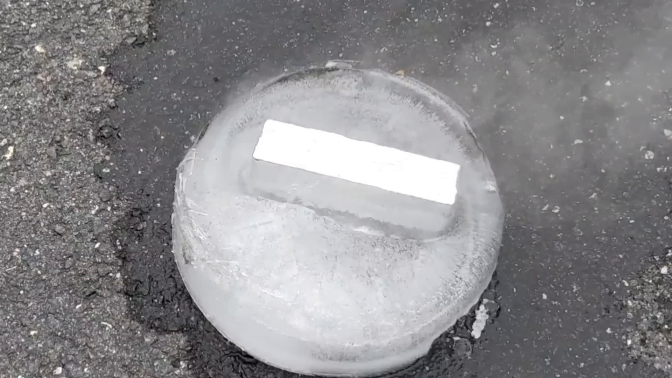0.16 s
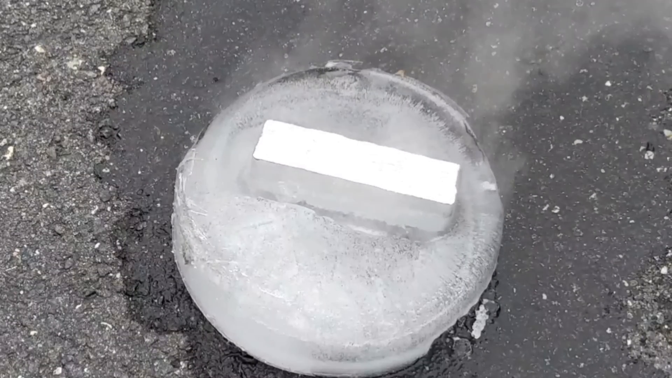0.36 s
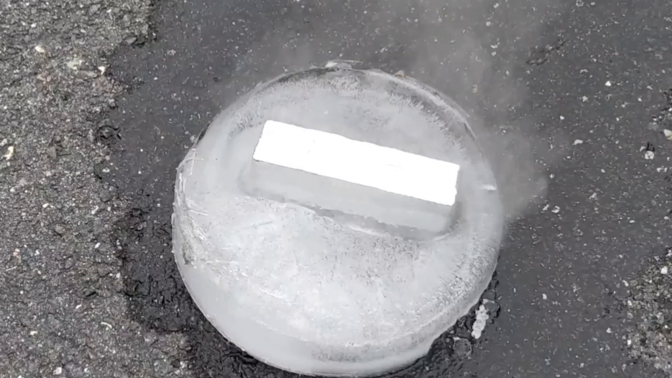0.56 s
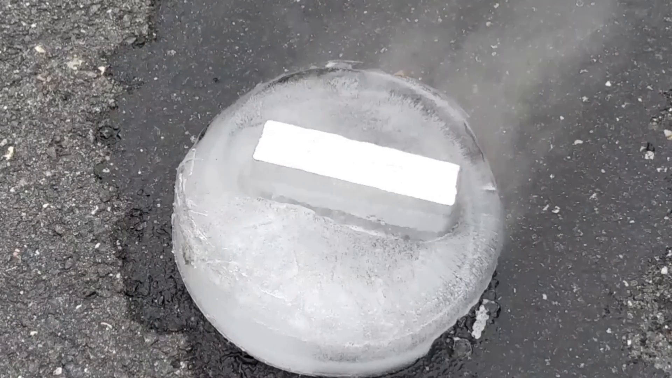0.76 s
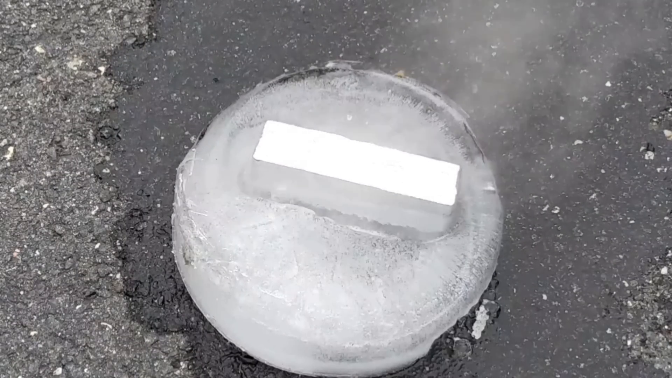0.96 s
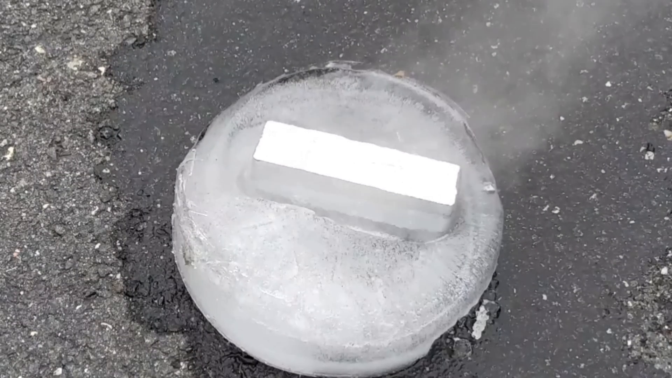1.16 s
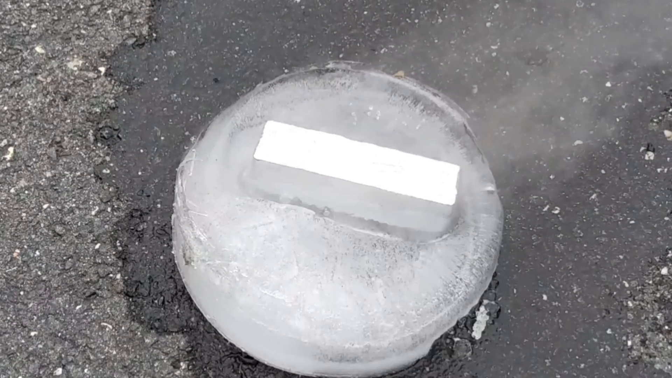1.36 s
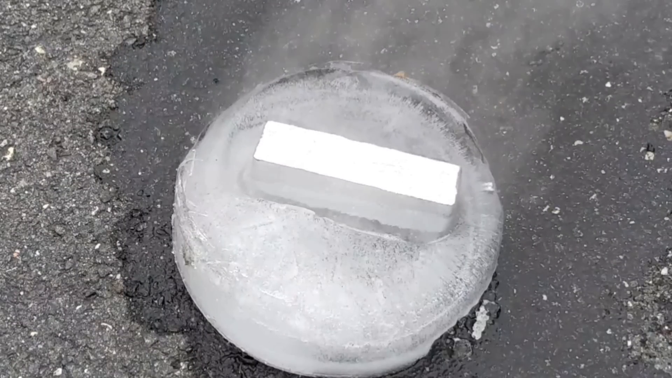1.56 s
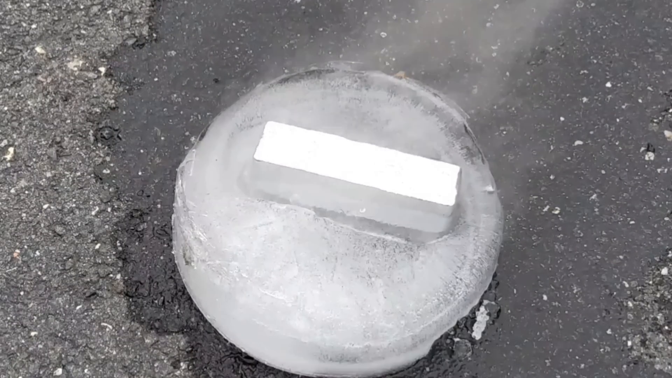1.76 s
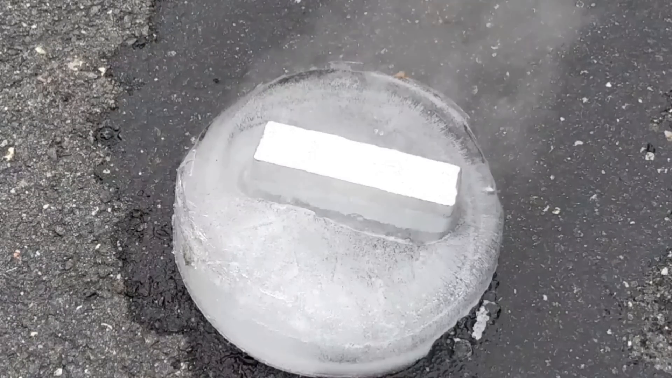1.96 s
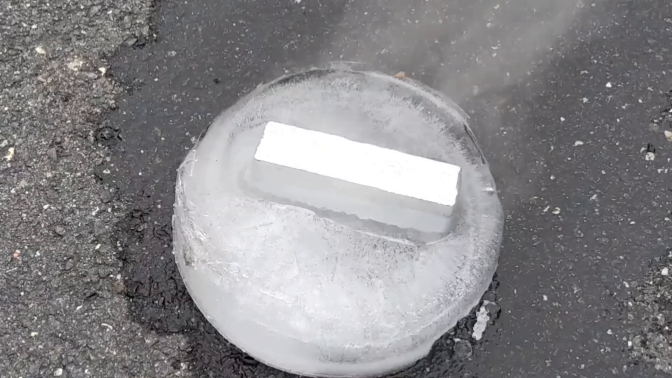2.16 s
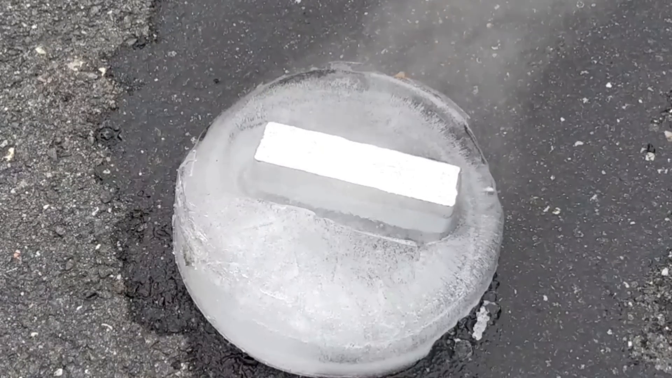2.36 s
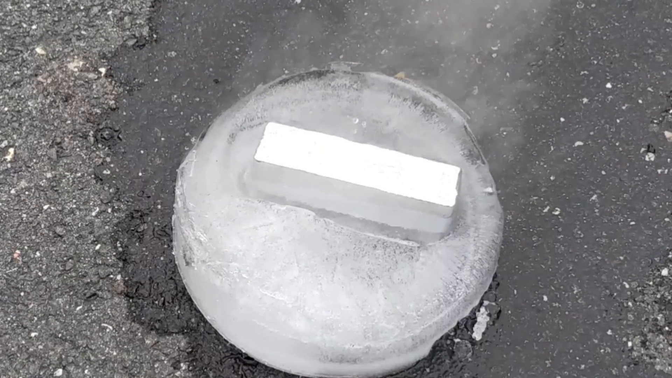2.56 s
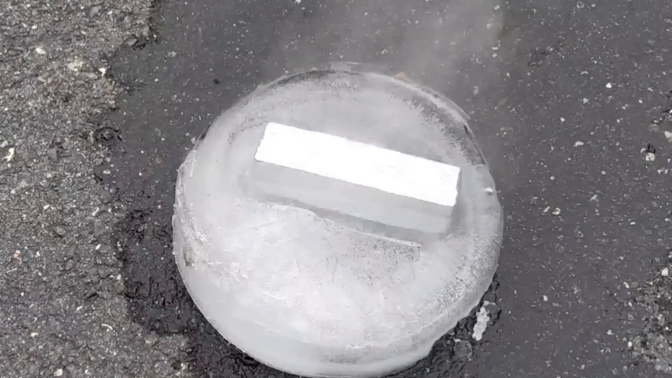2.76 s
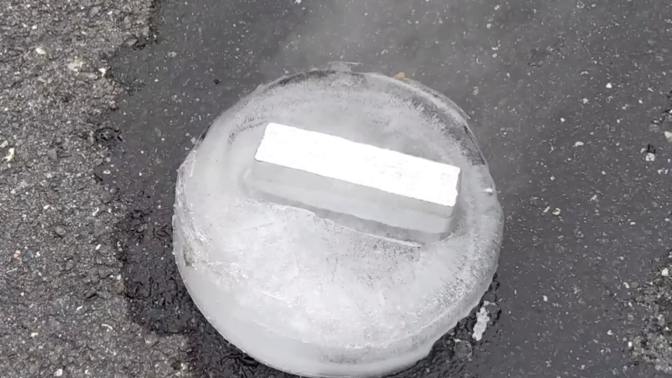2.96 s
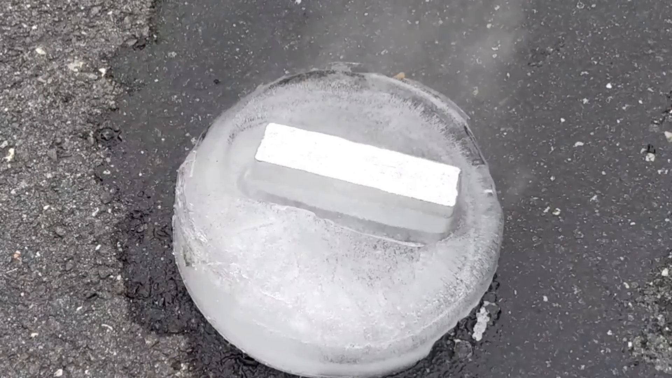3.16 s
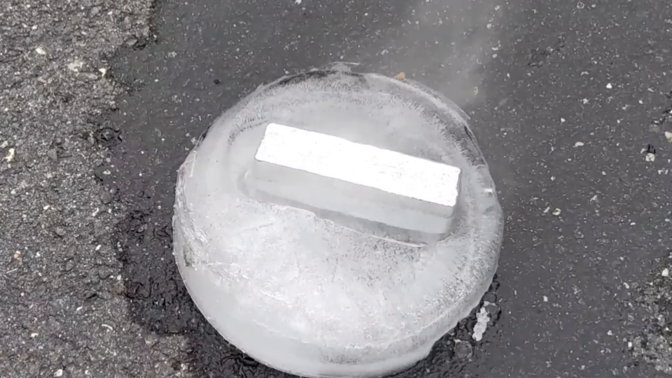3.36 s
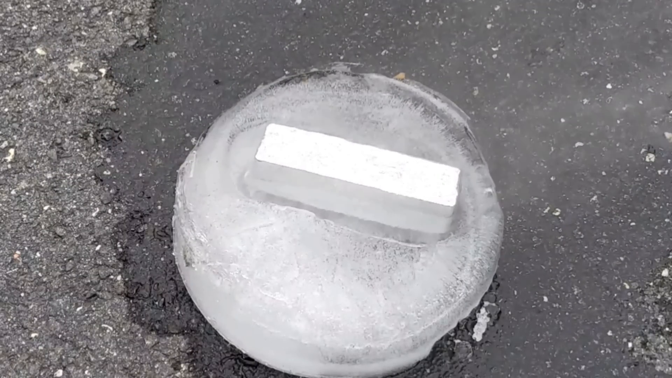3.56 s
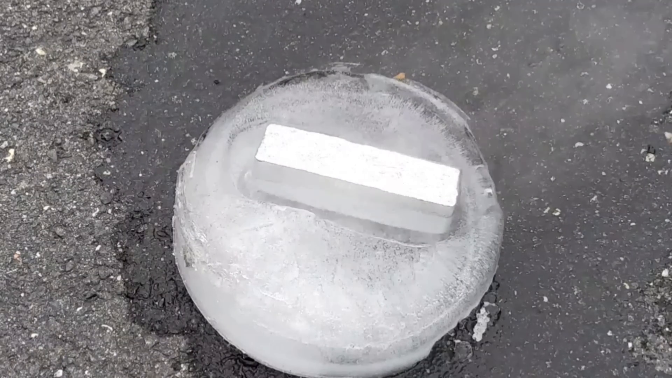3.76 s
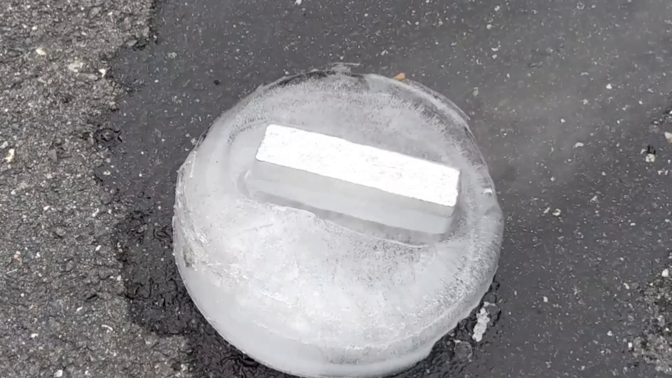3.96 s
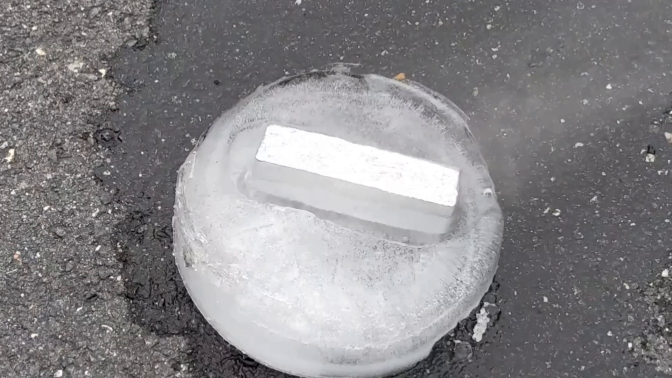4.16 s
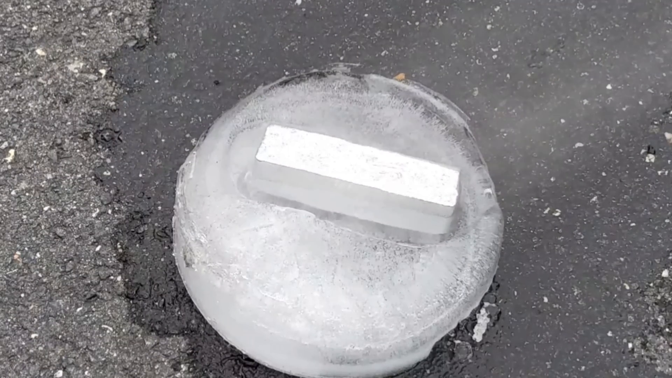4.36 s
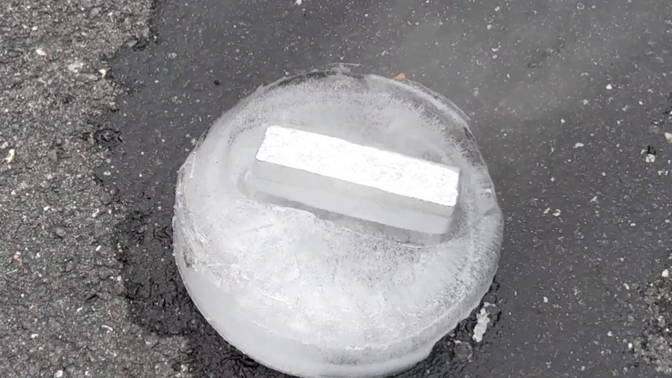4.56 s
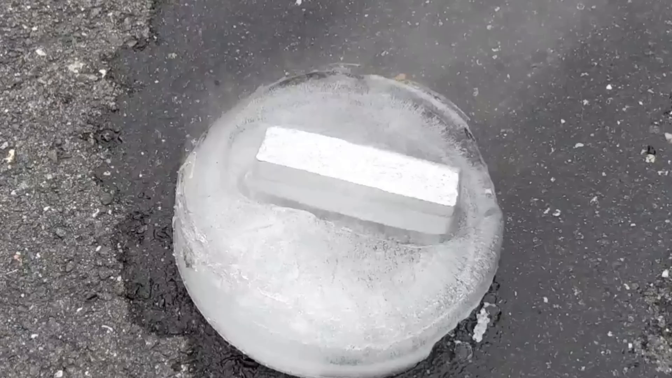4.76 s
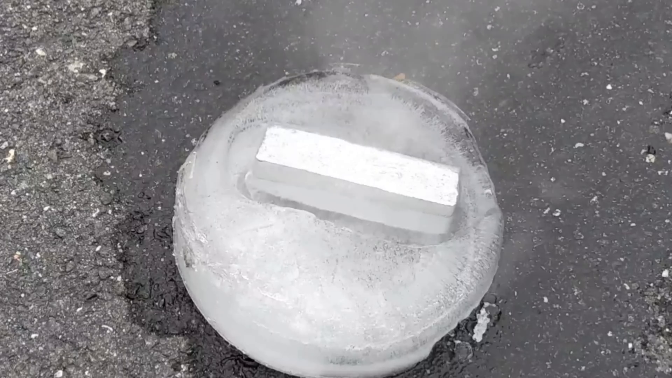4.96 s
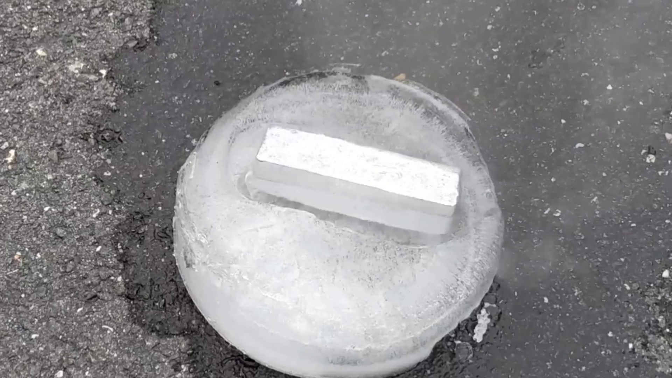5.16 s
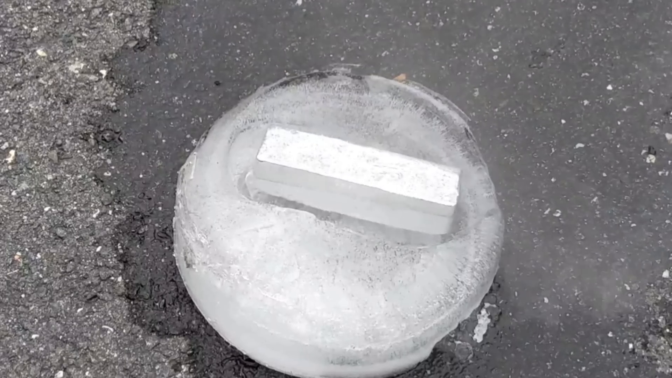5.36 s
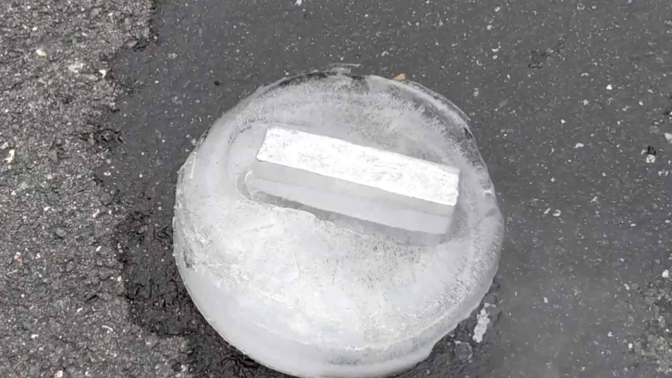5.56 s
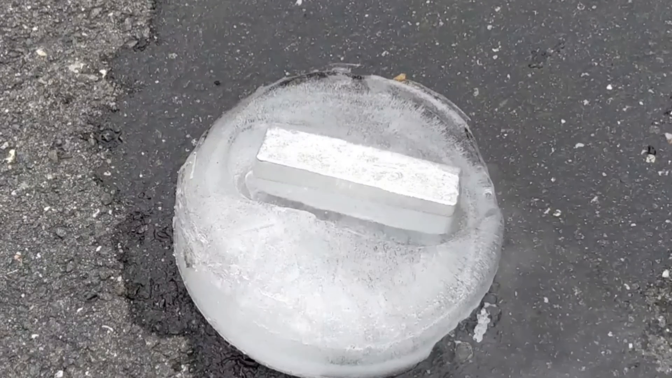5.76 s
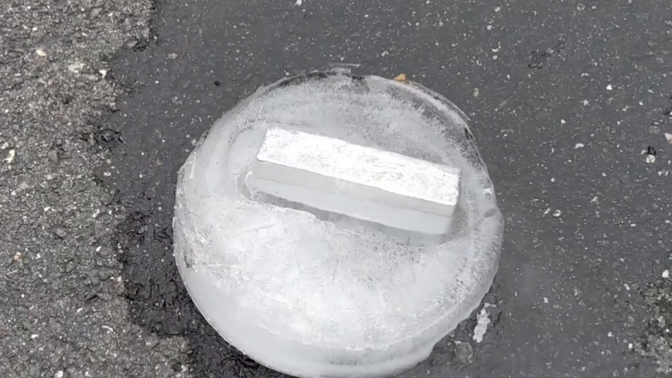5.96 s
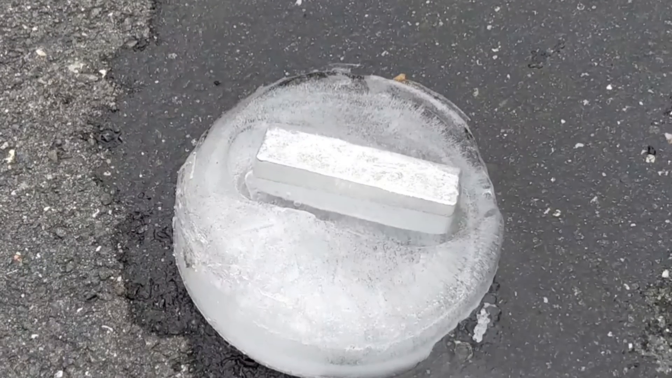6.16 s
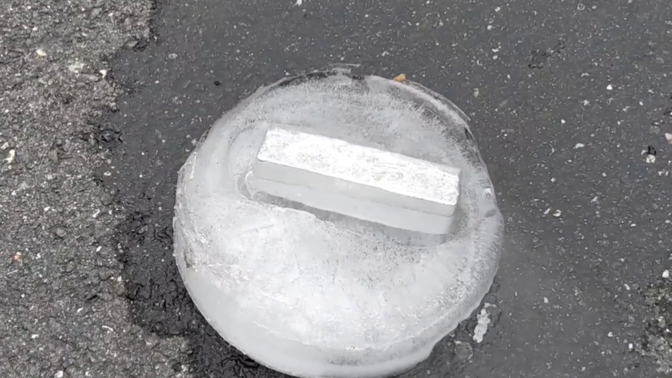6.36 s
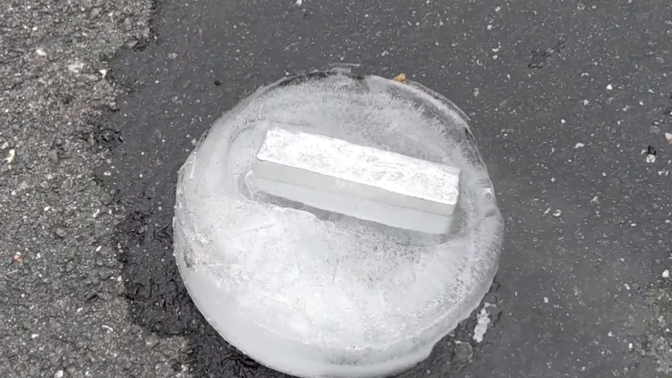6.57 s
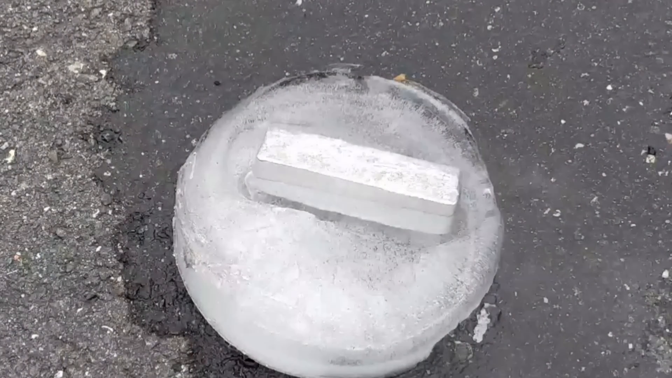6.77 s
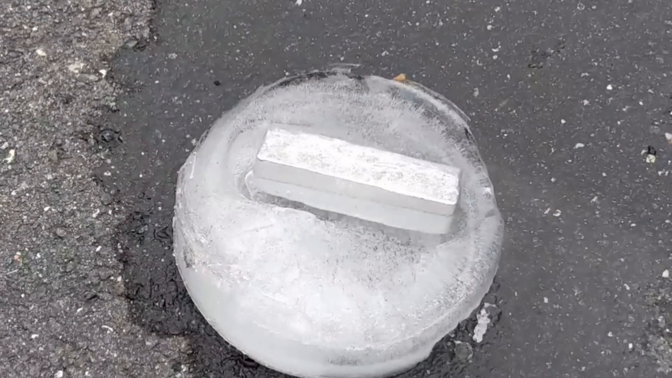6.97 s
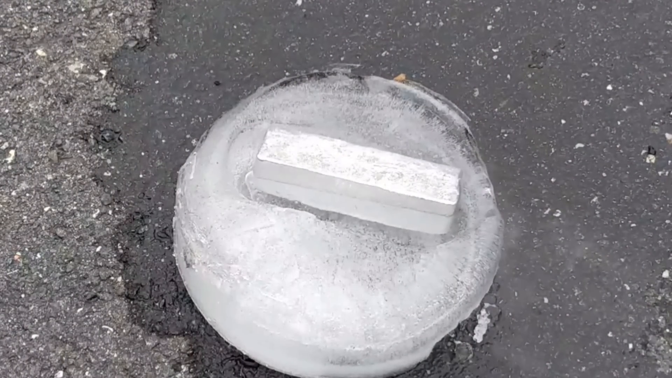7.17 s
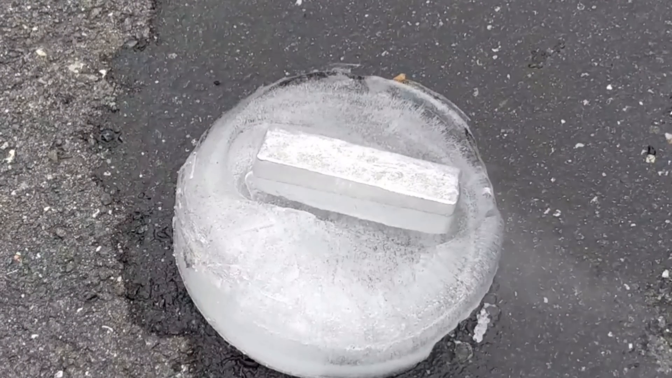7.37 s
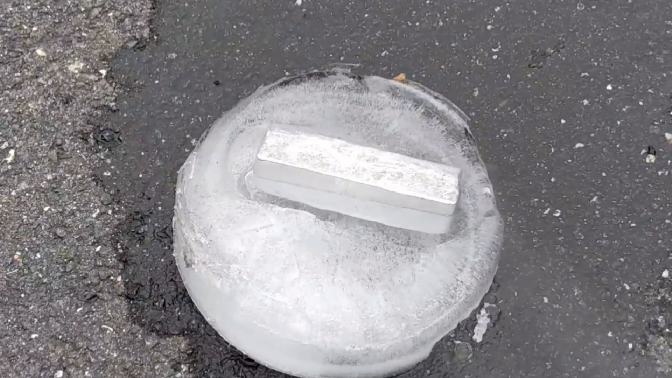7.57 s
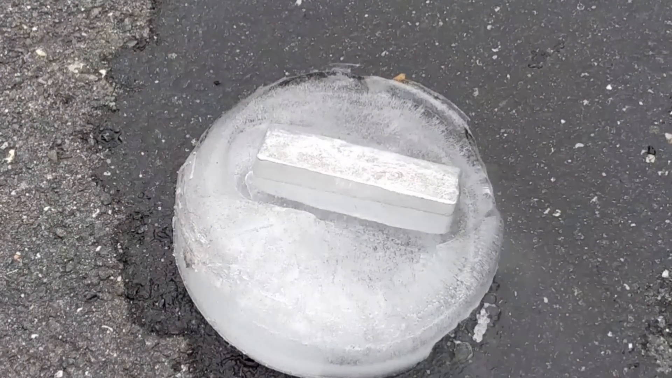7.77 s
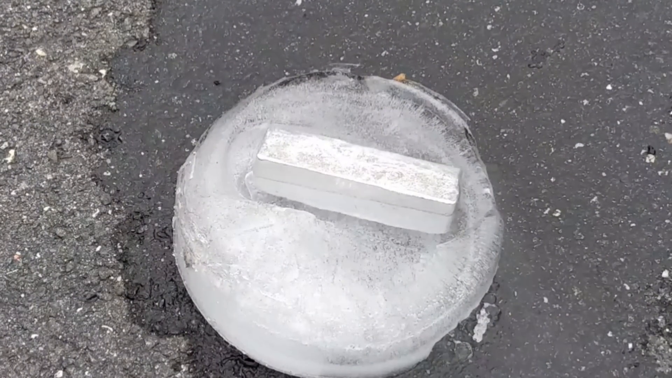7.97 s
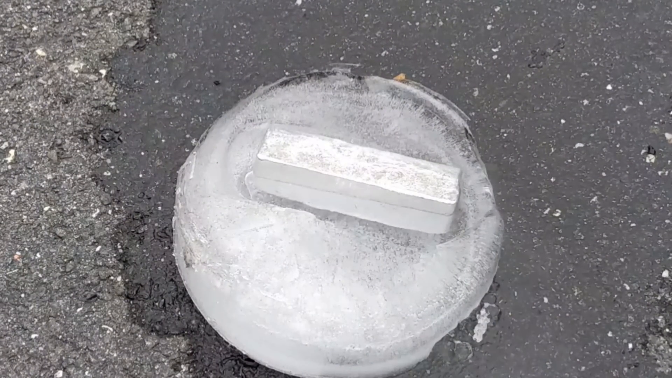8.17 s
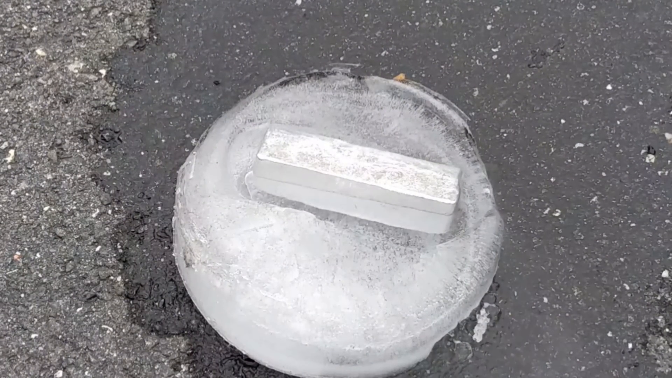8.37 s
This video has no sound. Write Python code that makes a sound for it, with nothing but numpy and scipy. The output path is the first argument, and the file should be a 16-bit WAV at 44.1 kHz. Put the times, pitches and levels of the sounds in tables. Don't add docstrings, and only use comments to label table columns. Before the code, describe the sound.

Outdoors, close stereo microphones catch a hot metal bar sizzling on ice. A dense, bright steam roar with low bubbling rumble starts at full strength, dulls and weakens after a few seconds, and shrinks to thin hiss. Wind thumps and flutters separately left and right throughout; two or three short steam spurts puff near the end.

```python
import sys
import numpy as np
from scipy import signal
from scipy.fft import rfft, irfft, next_fast_len
from scipy.io import wavfile
from scipy.ndimage import uniform_filter1d

SR = 44100
rng = np.random.default_rng(int(sys.argv[2]) if len(sys.argv) > 2 else 0)


def master_out(mix):
    frames = np.transpose(np.atleast_2d(mix))
    ceiling = np.clip(frames, -1, 1)
    pcm = np.round(ceiling * 32767).astype(np.int16)
    wavfile.write(sys.argv[1], SR, pcm)


def gain_from_db(level_db):
    decades = np.asarray(level_db, float) / 20
    return 10 ** decades


N = 371306
PADDED = next_fast_len(N + 8192)
HZ = np.maximum(np.fft.rfftfreq(PADDED, 1 / SR), 1)

# start_s, length_s, pitch_hz, level_db
DRONE = (3.97, .48, 145, -65)
# pitch_hz, level_db (per Hz)
RUSTLE = [(200, -115), (400, -105), (850, -101), (1400, -108), (3000, -114), (8000, -125)]
# pitch_hz, level_db (per Hz)
RUMBLE = [(60, -100), (130, -83.5), (200, -80.5), (330, -87), (500, -100.5), (800, -115), (2500, -140)]
# time_s, left_db, right_db
BREEZE = [(0, -48, -46.5), (0.9, -58, -46), (0.98, -55, -64), (1.13, -68, -63), (1.2, -64, -50.5),
          (1.85, -65, -51.5), (2.35, -58, -51), (3.7, -58, -49.5), (4.0, -59, -47), (4.9, -62, -43.5),
          (5.28, -64, -54), (5.45, -53, -53.5), (6.4, -50.5, -50), (6.6, -47, -44), (7.0, -49, -53),
          (7.5, -49.5, -55), (8.1, -49.5, -53), (8.22, -56.5, -55)]
# centre_s, length_s, buffet_db, flutter_db (over the buffet)
LEFT_GUSTS = [(0.1, 0.034, -41.5, 0), (0.36, .07, -50, -1), (0.7, .04, -52, 0), (0.91, .05, -45, -11),
              (1.73, .05, -49, -4), (1.89, .05, -54, -9), (2.23, 0.091, -51, -3), (2.45, .05, -51, -5),
              (3.36, .06, -56, -10), (3.8, .06, -55, -12), (6.03, 0.11, -38.5, -31), (6.41, 0.056, -50, 1),
              (6.7, 0.06, -38, -22), (7.2, 0.1, -37.5, -13), (7.3, 0.11, -36, 0), (7.82, 0.043, -45, -25),
              (8.06, 0.096, -42.5, -16), (8.32, .08, -48, -25)]
# centre_s, length_s, buffet_db, flutter_db (over the buffet)
RIGHT_GUSTS = [(0.12, 0.042, -42, -17), (0.2, 0.04, -47, -18), (0.37, 0.04, -44, -2),
               (0.64, 0.16, -39.5, -13), (0.85, 0.051, -44.5, -4.5), (1.51, 0.058, -46, -18),
               (1.66, 0.082, -42.5, -5), (2.0, 0.04, -43, -14), (2.16, 0.15, -41, -16),
               (2.24, 0.035, -41, -17), (2.45, 0.05, -45, -19), (2.59, 0.056, -43.5, -19),
               (2.99, 0.11, -34.5, -7), (3.44, 0.06, -45.5, -0.5), (4.06, 0.09, -40, -19),
               (4.32, 0.16, -43.5, -8), (4.49, 0.047, -41, -8), (4.62, 0.035, -39.5, -9),
               (4.81, 0.053, -35.5, -3.5), (4.99, 0.1, -40, -7), (5.39, 0.088, -40.5, -11),
               (5.99, 0.054, -46, -22), (6.56, 0.05, -39.5, -20), (6.65, 0.038, -46, -7),
               (6.81, 0.039, -38, -3.5), (7.07, 0.15, -41.5, -11.5), (7.25, 0.087, -44, -17),
               (7.4, 0.056, -41, -18), (7.69, 0.043, -42, -21), (8.21, 0.027, -36.5, -19)]
# start_s, peak_db, lean_left_db
SLAPS = [(0.099, -37, -4), (0.359, -45, -9.0), (0.617, -31.5, -18), (0.848, -33, -18), (1.649, -47, -13.0),
         (2.966, -32, -24), (3.422, -44, -18.5), (4.299, -41, -9), (4.499, -52, -22.0), (4.789, -33, -30),
         (4.969, -34, -25), (5.389, -40, -9.0), (6.039, -57, 3.0), (6.675, -47, 10.5), (6.789, -29.5, -11),
         (7.05, -44, -6), (7.689, -51, 9), (8.049, -46, 7), (8.193, -47, -22.5)]
# pitch_hz, level_db (per Hz)
BUFFET = [(5, -9), (12, -12.5), (24, 3), (45, 1.5), (75, -3), (110, -15.5), (160, -21.5), (300, -63),
          (2000, -120)]
# pitch_hz, level_db (per Hz)
FLUTTER = [(20, -69), (70, -10), (110, 4.5), (150, 5), (200, -3), (270, -10), (350, -29), (600, -32),
           (3000, -110)]
# time_s, vigour_db, fine_spray_db (over the vigour)
BOIL = [(0, 0.3, -0.8), (0.9, -0.02, 0.3), (1.5, -1, 0.1), (1.9, -2, 0.4), (2.5, -3, -1.8), (2.75, -4, -3),
        (3.1, -4.5, -4.5), (3.9, -9, -2), (4.9, -11, -2.5), (5.35, -14.2, -0.4), (5.6, -17, 0.5),
        (6.2, -20, 2), (6.75, -20.5, 2), (7.1, -22, 0.3), (7.65, -25, 0.5), (7.95, -27.5, -1),
        (8.42, -28.5, -3)]
BOIL_HZ = [500, 1100, 3300, 5000, 6300, 8100, 10600]
# start_s, hold_s, tail_s, level_db
SPURTS = [
    (6.794, 0.03, 0.014, -14.5),
    (7.208, .07, .03, -16.5),
    (7.26, 0.06, 0.031, -16.5),
]
# pitch_hz, level_db (over the steam)
SPURT_COLOUR = [(400, 9.5), (1000, -3), (3000, -0.5), (5000, -6.5), (5700, -5), (6300, -20), (9000, -50)]
# pitch_hz, level_db
GROOVE = [(430, 0), (530, 1.5), (640, -1.5), (760, 1), (1000, 0.5), (1350, -1.2), (1700, -1.1), (2100, 1.5),
          (2400, 0.4), (2700, 0)]
# pitch_hz, level_db (per Hz)
LEFT_STEAM = [(350, -83.5), (640, -84), (1000, -77.5), (1700, -69.5), (2550, -78), (3400, -70),
              (4600, -75.5), (6400, -76), (7900, -70.5), (8600, -75), (10000, -76.0), (11300, -97.5),
              (13200, -104), (14700, -85.5)]
# pitch_hz, level_db (per Hz)
RIGHT_STEAM = [(350, -83), (640, -83.5), (1000, -76.5), (1600, -70), (2500, -78.5), (3700, -77),
               (4900, -62), (6000, -76.5), (7200, -78), (8900, -68.5), (9900, -75), (11100, -66),
               (12500, -74.5), (14700, -77.5)]
# pitch_hz, left_db, right_db
TOP_EDGE = [(14650, 1, 1), (14900, -6, -5), (15200, -70, -11), (15650, -90, 2), (15780, -90, -18),
            (15810, -90, -48)]
# pitch_hz, likeness (0 to 1)
LIKENESS = [(350, 0.85), (1000, 0.86), (1800, .97), (2600, 0.76), (3200, 1), (3650, 0), (3900, 0.83),
            (5200, 0.66), (6200, 0.6), (6900, 1), (7600, 0.22), (8200, 0.27), (10500, 0.73), (12500, 0.06)]
# pitch_hz, right_lead_radians
LEAD = [(300, 0.14), (1800, 0.19), (2600, 0.97), (3600, 0.8), (3850, 2.36), (4600, 2.84), (5300, 1.02),
        (6100, 0.95), (6400, 1.96), (7300, 1.86), (8100, 5.1), (9100, 2.8), (10200, 4.9), (12000, 3.3)]


def rms_one(x):
    return x / np.sqrt(np.mean(x ** 2) + 1e-20)


def in_time(rows):
    s, *columns = np.transpose(rows)
    return [np.interp(np.arange(N) / SR, s, column) for column in columns]


def on_hz(points, order=1):
    points = np.array(points)
    return np.interp(np.log(HZ), np.log(points[:, 0]), points[:, order])


def to_hz(x):
    return rfft(x, PADDED)


def to_time(spectrum):
    return irfft(spectrum, PADDED)[..., :N]


def coloured(x, gain):
    return to_time(to_hz(x) * gain)


def drift(rate):
    step = 40
    r = np.exp(-2 * np.pi * rate * step / SR)
    noise = rng.standard_normal(N // step + 2002)
    slow = signal.lfilter([1], [1, -2 * r, r * r], noise)[2000:]
    return np.interp(np.arange(N) / step, np.arange(len(slow)), rms_one(slow))


def flicker(rate):
    wobble = drift(rate)
    return rms_one(wobble - uniform_filter1d(wobble, int(2.5 * SR / rate)))


def drone():
    s, length, hz, level_db = DRONE
    t = np.arange(N) / SR
    swell = np.clip(np.minimum(t - s, s + length - t) / 0.087, 0, 1)
    return np.sqrt(2) * gain_from_db(level_db) * swell * np.sin(2 * np.pi * hz * t)


def rustle():
    noise = rng.standard_normal((2, N)) * np.sqrt(SR / 2)
    return coloured(noise, gain_from_db(on_hz(RUSTLE)))


def rumble(alike):
    mid, side = rng.standard_normal((2, N)) * np.sqrt(SR / 4)
    alike = np.clip(alike, 0, 1)
    pair = np.sqrt(1 + alike) * mid + np.sqrt(1 - alike) * side * [[1], [-1]]
    fading_db = 0.57 * in_time(BOIL)[0] + 1.0 * drift(7.0)
    return gain_from_db(fading_db) * coloured(pair, gain_from_db(on_hz(RUMBLE)))


def gusts(rows):
    t, out = np.arange(N) / SR, np.zeros((2, N))
    for s, length, level_db, flutter_db in rows:
        bell = np.exp(-(2.23 * (t - s) / length) ** 2)
        both_db = level_db - 0.5 + np.array([[0], [flutter_db]])
        out += gain_from_db(2 * both_db) * bell
    return out


def slaps(rise_s, fall_s):
    t, out = np.arange(N) / SR, np.zeros((2, N))
    for s, level_db, lean_db in SLAPS:
        late = t - s - 2 * rise_s
        swell = np.exp(-(late / np.where(late < 0, rise_s, fall_s)) ** 2)
        weaker_db = np.minimum([[lean_db], [-lean_db]], 0)
        out += gain_from_db(level_db - 3.5 + weaker_db) * swell
    return out


def eddies(spectrum, even_s, lumpy_db, rate):
    noise = coloured(rng.standard_normal((2, N)), gain_from_db(on_hz(spectrum)))
    window = int(even_s * SR)
    strength = np.sqrt(uniform_filter1d(uniform_filter1d(noise ** 2, window), window))
    lumps = gain_from_db(lumpy_db * np.array([flicker(rate), flicker(rate)]))
    return lumps * noise / strength


def wind():
    lull_db, lulls_per_s = 1.5, 7
    flutter_db, slap_flutter_db = -14, -3.5
    lulls = lull_db * np.array([flicker(lulls_per_s), flicker(lulls_per_s)])
    breeze = gain_from_db(np.array(in_time(BREEZE)) + lulls)
    gust, flare = np.swapaxes([gusts(LEFT_GUSTS), gusts(RIGHT_GUSTS)], 0, 1)
    slap = slaps(rise_s=0.0062, fall_s=0.016)
    buffet = np.sqrt(breeze ** 2 + gust + slap ** 2)
    flutter = np.sqrt((gain_from_db(flutter_db) * breeze) ** 2 + flare + (gain_from_db(slap_flutter_db) * slap) ** 2)
    return (buffet * eddies(BUFFET, even_s=0.041, lumpy_db=0.9, rate=22.0)
            + flutter * eddies(FLUTTER, even_s=0.085, lumpy_db=2.0, rate=13.6))


def bursts(per_s, spread_db):
    born = rng.random((2, N)) < per_s / SR
    sizes_db = spread_db * np.minimum(rng.exponential(1, (2, N)), 3)
    sizes = gain_from_db(sizes_db) * rng.standard_normal((2, N))
    return rms_one(born * sizes) * np.sqrt(SR / 2)


def boil():
    loss_db, settles_db = -4, 2
    recovers, spray_share = 0.024, 0.09
    lead_s, lingers, spray_fades = 0.27, 0.17, 0.017
    roar, fine = in_time(BOIL)
    dulled = loss_db * (1 - np.exp(-(roar / settles_db) ** 2))
    hiss = (1 - recovers) * roar + dulled + spray_share * fine
    fizz = roar + fine
    samples = np.arange(N)
    ahead = np.interp(samples + lead_s * SR, samples, fizz)
    half_ahead = np.interp(samples + lead_s / 2 * SR, samples, fizz)
    sizzle = ahead - lingers * roar
    spray = half_ahead + spray_fades * roar
    return roar, hiss, sizzle, spray, fizz


def spurts():
    t, power = np.arange(N) / SR, np.zeros(N)
    for s, hold, tail, level_db in SPURTS:
        opening = np.clip((t - s) / .012, 0, 1)
        dying = np.exp(-np.clip(t - s - hold, 0, None) / tail)
        power += gain_from_db(2 * level_db) * opening * dying
    return np.sqrt(power)


def steam(throb_db, patchy_db):
    roar, hiss, sizzle, spray, fizz = boil()
    pool = 0.71 * roar
    levels = [pool, roar, roar, hiss, sizzle, spray, fizz]
    heat = np.clip(1 + roar / 40, 0, 1)
    throb = throb_db * heat * flicker(13.7)
    shower = to_hz(bursts(per_s=40000, spread_db=.3))
    pockets = spurts()
    spurt_hz, spurt_db = np.transpose(SPURT_COLOUR)
    centres = np.log(np.geomspace(400, 14000, 14))
    out = 0
    for k, centre in enumerate(centres):
        share = np.interp(np.log(HZ), centres, np.arange(14) == k)
        weights = [np.interp(centre, np.log(BOIL_HZ), row) for row in np.eye(7)]
        steady = gain_from_db(np.dot(weights, levels) + throb)
        spurt = pockets * gain_from_db(np.interp(centre, np.log(spurt_hz), spurt_db))
        patches = gain_from_db(patchy_db * flicker(10.3))
        out = out + np.hypot(steady, spurt) * patches * to_time(shower * share)
    return out


def microphones(shower, narrowing):
    low_cut = HZ ** 2 / (HZ ** 2 + 260 ** 2)
    common, other = to_hz(shower) * gain_from_db(on_hz(GROOVE)) * low_cut
    left = to_time(gain_from_db(on_hz(LEFT_STEAM) + on_hz(TOP_EDGE)) * common)
    right_gain = gain_from_db(on_hz(RIGHT_STEAM) + on_hz(TOP_EDGE, order=2))
    shifted = np.exp(1j * on_hz(LEAD)) * common
    likeness = np.clip(on_hz(LIKENESS), .01, 1)

    def right(alike):
        return to_time(right_gain * (alike * shifted + np.sqrt(1 - alike ** 2) * other))

    early = right(likeness ** (1 + narrowing))
    late = right(likeness ** (1 - narrowing))
    shrink = np.linspace(0, 1, N)
    return np.array([left, (1 - shrink) * early + shrink * late])


def scene():
    background = drone() + rustle() + rumble(alike=1.0) + wind()
    return background + microphones(steam(throb_db=0.38, patchy_db=0.5), narrowing=0.29)


def top_cut(x):
    return signal.sosfilt(signal.butter(12, 15850, fs=SR, output="sos"), x)


def record(dry):
    return top_cut(dry)


dry = scene()
out = record(dry)
master_out(out)
```